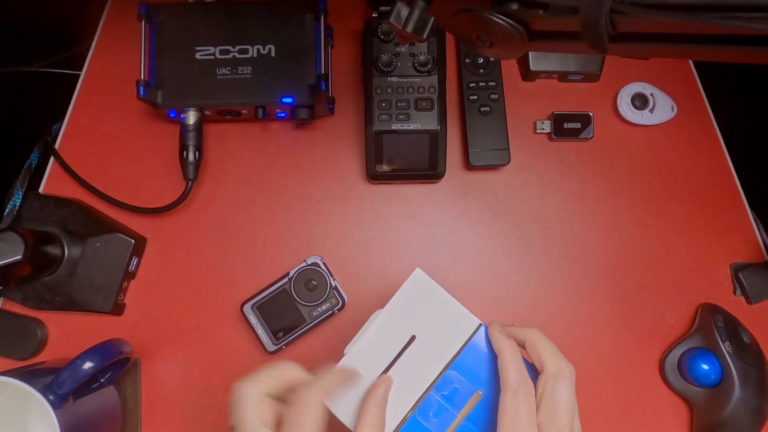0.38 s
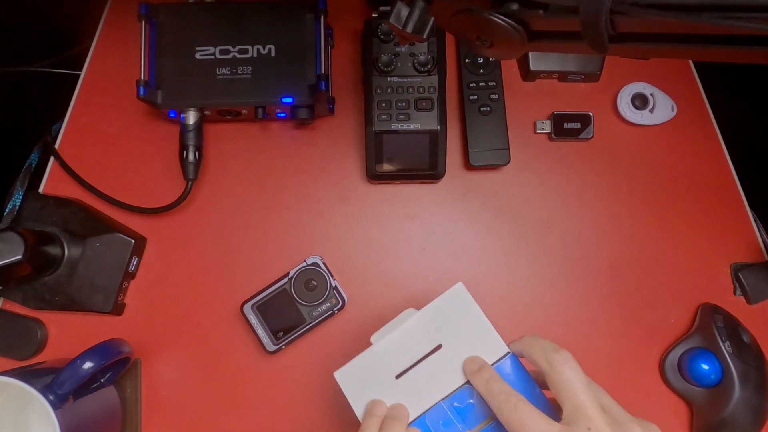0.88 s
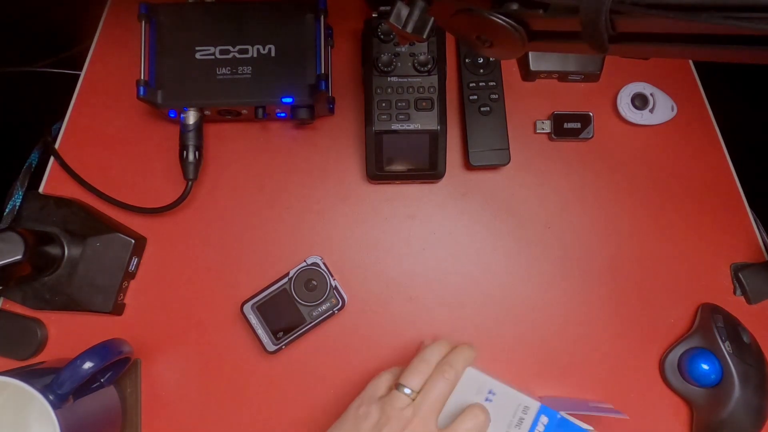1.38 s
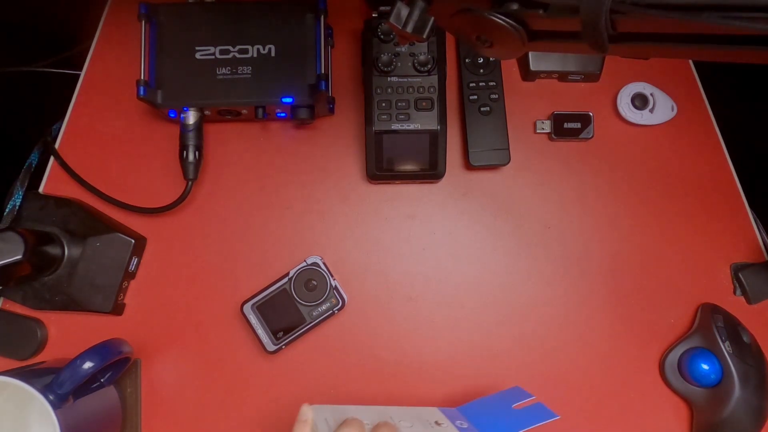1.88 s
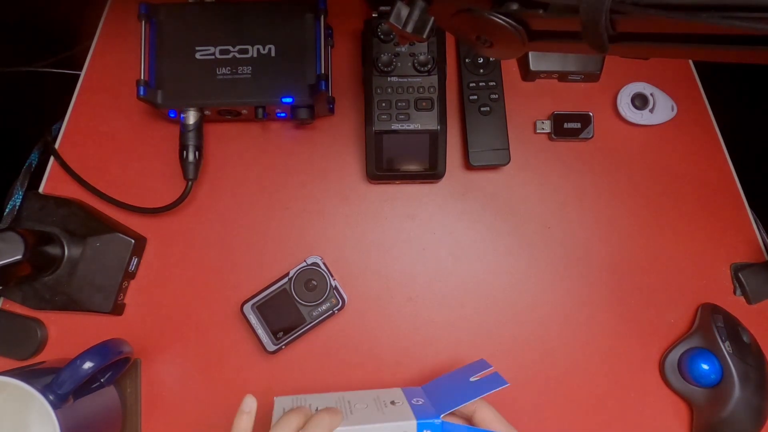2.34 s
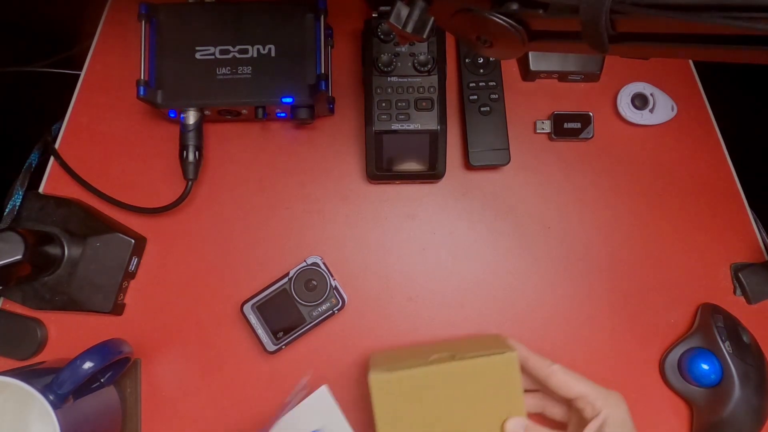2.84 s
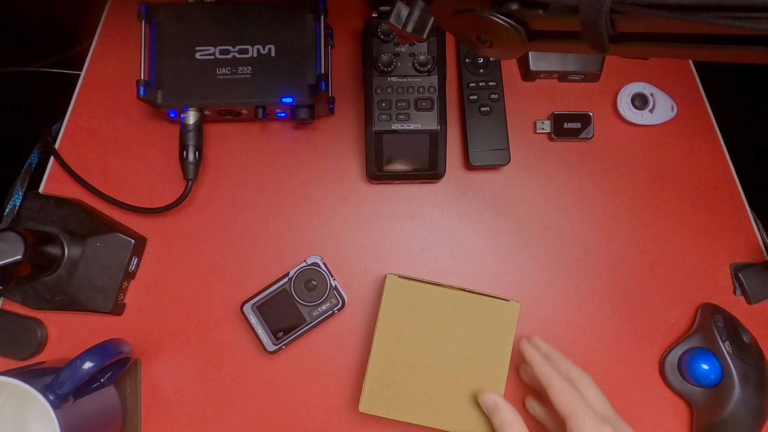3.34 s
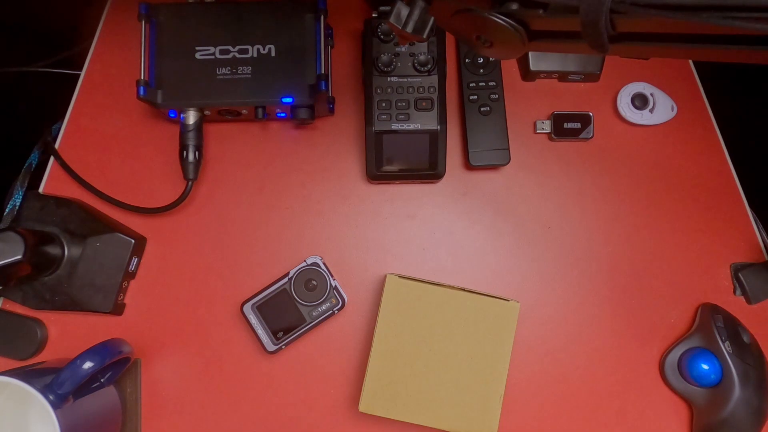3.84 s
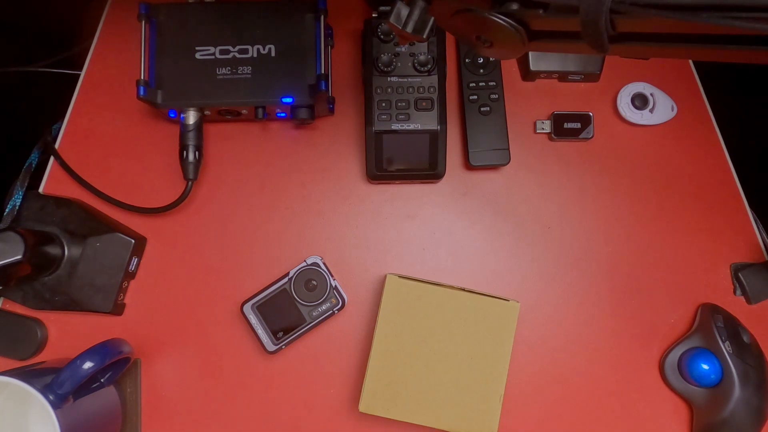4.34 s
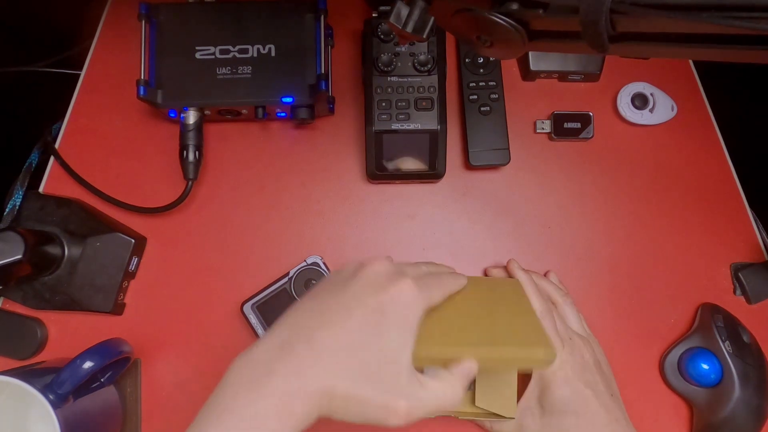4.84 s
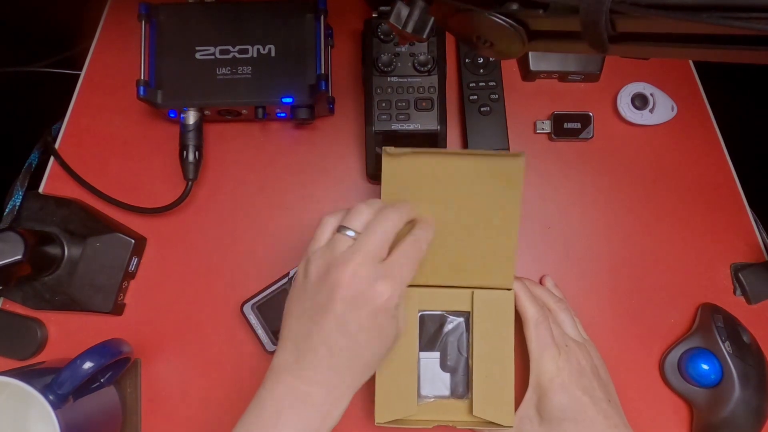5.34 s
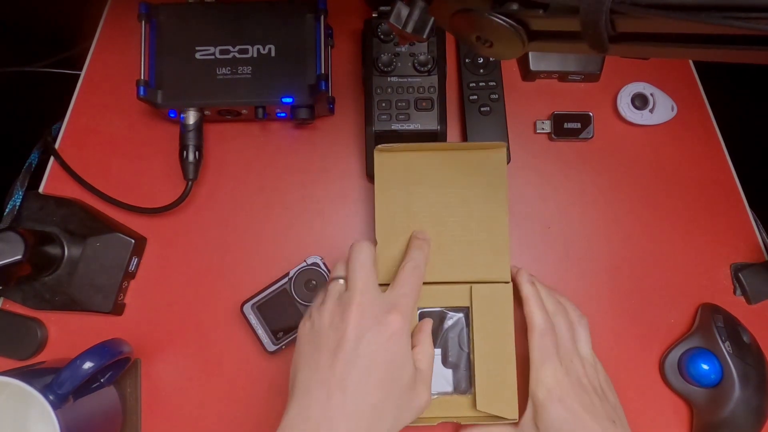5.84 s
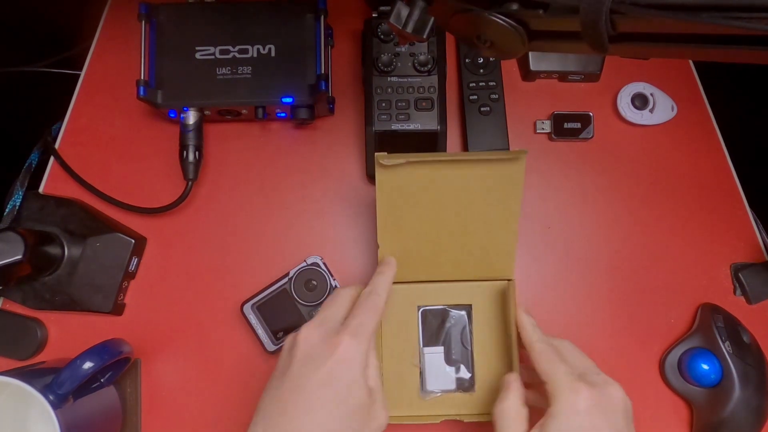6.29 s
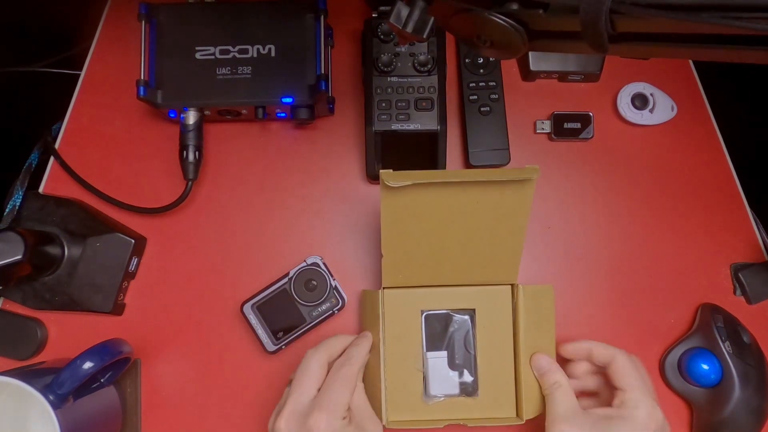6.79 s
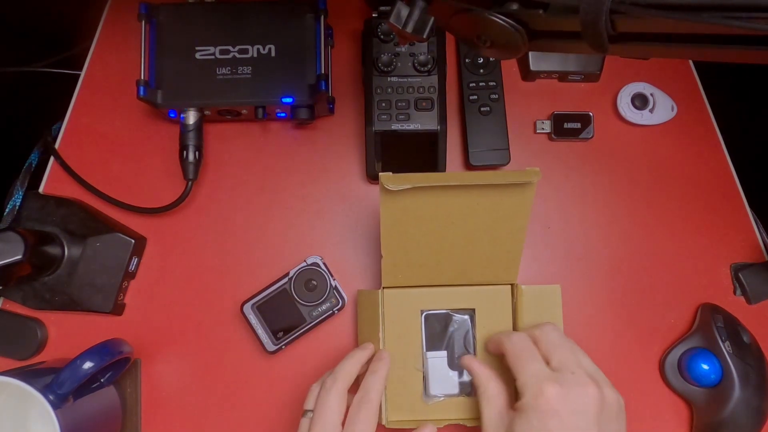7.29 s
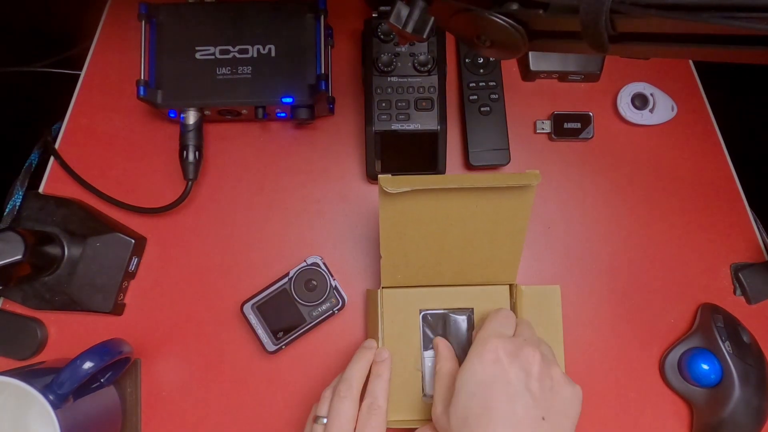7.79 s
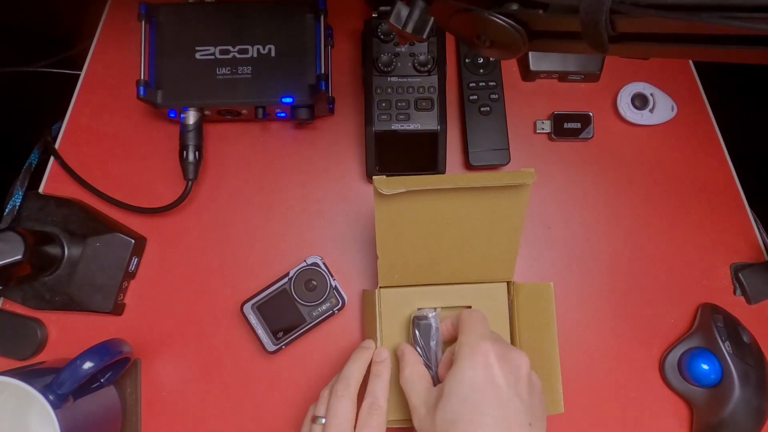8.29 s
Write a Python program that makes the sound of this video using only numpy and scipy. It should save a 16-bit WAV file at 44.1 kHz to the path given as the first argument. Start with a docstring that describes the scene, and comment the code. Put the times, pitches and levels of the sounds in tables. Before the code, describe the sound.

A small cardboard box is handled close to the microphone in a quiet, dry room. From 0 to 0.8 s there is only faint papery rubbing. Around 0.9 to 1.3 s it grows firmer, with quick crease snaps and soft hollow taps, and near 1.85 s comes a sharp double snap with a scrape and knock. Quieter rustling leads to a fuller rasp at 2.6 s. At about 3.2 to 3.3 s the box meets the desk with light hollow knocks, then near silence until 4.65 s. A high singing scrape and a tight burst of hard snaps break it; at 5.1 s a bright squeak, snap and box knock follow. From 5.9 to 7.1 s flaps rub and rasp more strongly with crisp snaps, then softer rubbing and small bright ticks continue to a last snap at 8.65 s. Low rumble swells beneath the movement.

```python
"""Hands work a paper sleeve off a small cardboard box, set it on a desk, pull the lid open and fold the flaps.
Soft rubbing leads to snaps and knocks, then a near hush; a singing scrape and sharp snaps break it, then rubbing
and small snaps go on to the end. Rubs and scrapes are dense grains rung by panel resonances; snaps and thuds are
noise bursts; knocks ring the modes of the hollow box. In a quiet dry room, a deep background rumble of filtered
noise rises while there is sound and sinks in the hush."""
import sys
import numpy as np
from scipy import signal
from scipy.fft import rfft, irfft
from scipy.io import wavfile

SR = 44100
rng = np.random.default_rng(int(sys.argv[2]) if len(sys.argv) > 2 else 0)


def waveform_to_disk(signal):
    """Save audio, clipped to [-1, 1], as 16-bit WAV at the path in sys.argv[1]."""
    frames = np.transpose(np.atleast_2d(signal))
    scaled = np.clip(frames, -1, 1) * 32767
    samples = np.round(scaled).astype(np.int16)
    wavfile.write(sys.argv[1], SR, samples)


def convert_level_to_amplitude(level_db):
    """Map a level in decibels to its linear amplitude factor."""
    exponent = np.asarray(level_db, float) / 20
    return 10 ** exponent


N = 382170

# hollow box meeting the desk or losing its tab: (time [s], level [dB], brightness [dB per octave])
BOX_BLOWS = [(0.912, -38, -2), (1.013, -34.5, -2), (1.291, -29, -4.5), (1.335, -36.5, -3),
             (1.575, -42.5, 1.7), (1.861, -27.5, 2.5), (2.598, -39, -9.5), (2.776, -48, -3),
             (3.232, -24.5, 2.5), (3.244, -28.5, 0), (3.326, -26.5, -2.5), (5.141, -21, -3),
             (5.376, -38, 10), (5.537, -44, 10), (7.463, -53, 9.5), (8.12, -46, -2)]


def rms_one(x):
    """Scale to unit rms."""
    return x / np.sqrt(np.mean(x ** 2) + 1e-20)


def in_time(rows):
    """Columns of a timed table, drawn as straight lines with one value per sample."""
    s, *columns = np.transpose(rows)
    return [np.interp(np.arange(N) / SR, s, column) for column in columns]


def drift(rate_hz):
    """Slow random wander of rms 1: low-passed noise made at a twentieth of the sample rate."""
    r = np.exp(-40 * np.pi * rate_hz / SR)
    noise = rng.standard_normal(N // 20 + 2002)
    slow = signal.lfilter([1], [1, -2 * r, r * r], noise)[2000:]   # skip the filter's start
    return np.interp(np.arange(N) / 20, np.arange(len(slow)), rms_one(slow))


def band(x, low_hz, high_hz, order=2):
    """Butterworth band-pass."""
    return signal.sosfilt(signal.butter(order, [low_hz, high_hz], "band", fs=SR, output="sos"), x)


def resonance(x, hz, width_hz):
    """Two-pole resonance with a peak gain of about 1."""
    r = np.exp(-np.pi * width_hz / SR)
    zeros = np.array([1, 0, -1]) * (1 - r * r) / 2
    poles = [1, -2 * r * np.cos(2 * np.pi * hz / SR), r * r]
    return signal.lfilter(zeros, poles, x)


def coloured(x, spectrum):
    """Give a noise the spectrum of a table."""
    hz, db = np.transpose(spectrum)
    bins_hz = np.arange(N // 2 + 1) * SR / N + 1
    return irfft(rfft(x) * convert_level_to_amplitude(np.interp(np.log(bins_hz), np.log(hz), db)), N)


def stroke(times, db, rise_db, fall_db):
    """One movement touches down, swells, fades and lets go: its samples and their gain."""
    soft_share, soft_db = 0.2, 25.5   # touch and release last this share of the swell and fade
    start, firm, end = times
    s = [start - soft_share * (firm - start), start, firm, end, end + soft_share * (end - firm)]
    at = np.arange(max(int(s[0] * SR), 0), min(int(s[-1] * SR), N))
    below_db = [rise_db + soft_db, rise_db, 0, fall_db, fall_db + soft_db]
    return at, convert_level_to_amplitude(db - np.interp(at / SR, s, below_db))


def rubbing():
    """Skin and paper sliding on card: a fine rasp with crackle in it, ringing fitfully in the free modes."""
    # strokes on card: (start [s], firmest [s], end [s], level [dB], free panel mode [Hz])
    strokes = [(0.0, 0.06, 0.22, -53.5, 2080), (0.137, 0.265, 0.3, -66, 2140),
               (0.345, 0.382, 0.45, -55.5, 950), (0.438, 0.469, 0.58, -55.5, 946),
               (0.566, 0.589, 0.72, -60.5, 1000), (0.646, 0.76, 0.85, -62, 990),
               (0.815, 0.922, 1.0, -51, 880), (1.035, 1.048, 1.1, -52, 980),
               (1.077, 1.12, 1.17, -71.5, 990), (1.148, 1.212, 1.3, -43, 2130),
               (1.256, 1.294, 1.55, -43.5, 2180), (1.521, 1.582, 1.62, -53, 1260),
               (1.606, 1.645, 1.777, -50, 1290), (1.69, 1.731, 1.82, -57, 1280),
               (1.76, 1.856, 1.91, -50, 1330), (1.887, 1.97, 2.07, -49, 3140),
               (2.09, 2.196, 2.3, -57, 1960), (2.28, 2.444, 2.475, -55.5, 1870),
               (2.536, 2.621, 2.845, -39.5, 990), (2.616, 2.728, 2.907, -53, 2450),
               (3.207, 3.28, 3.33, -53, 880), (3.299, 3.327, 3.4, -55, 930),
               (3.384, 3.452, 3.65, -85, 1016), (3.55, 3.722, 3.8, -84, 2300),
               (3.801, 3.806, 3.97, -76, 980), (3.83, 3.889, 3.9, -79, 1024), (4.01, 4.037, 4.07, -78, 870),
               (4.12, 4.131, 4.15, -70.5, 1355), (4.22, 4.262, 4.29, -82, 888),
               (4.35, 4.415, 4.44, -80, 824), (4.443, 4.451, 4.52, -78.5, 803),
               (4.665, 4.675, 4.7, -38.5, 2570), (4.732, 4.799, 4.9, -53, 1140),
               (4.797, 4.954, 5.08, -45, 1200), (5.141, 5.217, 5.415, -46, 3000),
               (5.388, 5.418, 5.49, -54.5, 960), (5.47, 5.525, 5.56, -62.5, 960),
               (5.548, 5.597, 5.69, -58, 940), (5.748, 5.784, 5.86, -58.5, 1005),
               (5.807, 5.881, 5.93, -53, 970), (5.902, 5.905, 6.1, -46, 970),
               (6.174, 6.2, 6.3, -48.5, 1005), (6.264, 6.339, 6.45, -43, 1000), (6.35, 6.49, 6.6, -40, 990),
               (6.528, 6.616, 6.66, -40.5, 1380), (6.687, 6.76, 6.778, -35.5, 1080),
               (6.784, 6.837, 6.93, -44.5, 1130), (6.866, 7, 7.1, -41, 1042), (7.0, 7.123, 7.16, -48, 1160),
               (7.146, 7.185, 7.27, -62.5, 1080), (7.262, 7.311, 7.38, -59, 1080),
               (7.324, 7.43, 7.47, -62.5, 1070), (7.44, 7.494, 7.62, -51.5, 1830),
               (7.558, 7.65, 7.7, -47.5, 1890), (7.687, 7.746, 7.8, -47.5, 990),
               (7.817, 7.98, 8.06, -56.5, 1100), (8.114, 8.143, 8.26, -46.5, 970),
               (8.213, 8.33, 8.385, -47.5, 980), (8.364, 8.406, 8.44, -60, 1070),
               (8.436, 8.497, 8.56, -54.5, 1100), (8.521, 8.588, 8.67, -52.5, 1075)]
    # how freely the handled card rings:
    # (time [s], share of the scuff in the free modes [0-1], hiss over scuff [dB], thrum over scuff [dB])
    grip = [(0.0, 0.82, -4.5, -10), (0.9, 0, -0.5, -3.5), (1.3, 0.02, -7, -6), (1.7, 0.01, -5, -5.5),
            (2.0, 0.28, -6, -7), (2.7, 0, -2, -11.5), (3.3, .15, -3, -3), (4.3, 0.27, -1.5, -6),
            (4.6, 0.4, -5.5, -8), (4.8, 0, -0.5, -7), (5.2, 0.02, 2.5, -9.5), (5.45, 0.5, -6.5, 1),
            (5.7, 0.55, -1.5, -12.5), (6.0, 0, -5.5, -8), (6.5, 0.07, 1.5, -19), (7.0, 0.66, -8.5, -13.5),
            (7.3, 0.6, -1.5, -3), (7.6, 0, -4, -7), (8.1, 0.09, -3, -6), (8.67, 0, -5.5, -9.5)]
    rise_db, fall_db = 13.5, 20   # swell up to the firmest moment, fade after it
    second_mode_ratio = 1.9
    rasp = grains(12000, spread_db=2.5, clump_db=1.5)
    rasp = rasp + 0.3 * crackle(830, cycles=12.0) + 0.3 * crackle(60, cycles=9.0)
    scuff, hiss, thrum = card(rasp, grip_db=2.5)
    first_flicker = convert_level_to_amplitude(5.2 * drift(26.0))
    second_flicker = convert_level_to_amplitude(5.2 * drift(26.0))

    # the fingers shift
    share, hiss_db, thrum_db = in_time(grip)
    share = np.clip(share, 0, 1)
    hiss_db = hiss_db + 2.8 * drift(9.0)
    thrum_db = thrum_db + 3.0 * drift(12.0)

    creaky_scuff = rms_one(scuff + convert_level_to_amplitude(-9) * creaks(rasp))
    plain = np.sqrt(1 - share) * creaky_scuff + convert_level_to_amplitude(hiss_db) * hiss + convert_level_to_amplitude(thrum_db) * thrum
    out = np.zeros(N)
    for *times, db, hz in strokes:
        at, gain = stroke(times, db, rise_db, fall_db)
        first = first_flicker[at] * rms_one(resonance(rasp[at], hz, hz * 0.075))
        second = second_flicker[at] * rms_one(resonance(rasp[at], hz * second_mode_ratio, hz * 0.11))
        free_ring = rms_one(first + 0.12 * second)
        out[at] += gain * (plain[at] + np.sqrt(share[at]) * free_ring)
    return out


def grains(per_s, spread_db, clump_db):
    """Fibres catch at random, in clumps, with uneven sizes."""
    sizes = convert_level_to_amplitude(spread_db * np.minimum(rng.exponential(1, N), 5)) * rng.choice([-1, 1], N)
    caught = rng.random(N) < per_s / SR
    return rms_one(sizes * caught * convert_level_to_amplitude(clump_db * drift(38)))


def crackle(per_s, cycles):
    """Small creases tick in clumps, each ringing a few cycles at one of 18 pitches dealt at random."""
    ticks = grains(per_s, spread_db=2.0, clump_db=3.0)
    pitches = np.geomspace(350, 6000, 18)
    dealt = rng.integers(0, len(pitches), N)
    out = np.zeros(N)
    for k, hz in enumerate(pitches):
        mine = ticks * (dealt == k) + 1e-18   # the offset keeps the filter off denormals
        out += resonance(mine, hz, hz / cycles) / hz ** 0.12
    return rms_one(out)


def creaks(rasp):
    """Bent card creaks: narrow tones all over the middle range, each coming and going on its own."""
    out = np.zeros(N)
    for hz in np.geomspace(700, 5200, 14) * rng.uniform(0.94, 1.06, 14):
        fits = convert_level_to_amplitude(9 * drift(5.9))
        out += fits * resonance(rasp, hz, hz * 0.01) / hz ** 0.33
    return rms_one(out)


def card(x, grip_db):
    """The rasp rings in panels whose levels wander with the grip; returned as scuff, hiss and thrum of rms 1."""
    # broad rasp of fibres: (frequency [Hz], relative level [dB])
    rasp_spectrum = [(71, -17.5), (120, -3.5), (250, 1), (748, -4.5), (2640, -0.5), (3440, -3),
                     (6460, -17.5), (14000, -12), (15500, -32)]
    # panel resonances laid over the rasp: (frequency [Hz], width [Hz], gain [dB])
    panel_modes = [(270, 73, -13.5), (408, 170, 2.5), (1100, 270, 5.5), (1930, 1000, -2), (2990, 290, -11),
                   (4680, 1100, -3), (6580, 900, 20.5)]
    broad = coloured(x, rasp_spectrum)
    ringing = broad
    for hz, width_hz, db in panel_modes:
        ringing = ringing + convert_level_to_amplitude(db + grip_db * drift(2.7)) * resonance(broad, hz, width_hz)

    # split at 650 and 4200 Hz, each crossover half an octave wide
    octaves = np.log2(np.arange(N // 2 + 1) * SR / N + 1)
    low = np.clip(0.5 + (np.log2(650) - octaves) * 2, 0, 1)
    high = np.clip(0.5 + (octaves - np.log2(4200)) * 2, 0, 1)
    spectrum = rfft(ringing)
    return [rms_one(irfft(spectrum * part, N)) for part in (1 - low - high, high, low)]


def slips():
    """A tight edge judders; part of its scrape sings in one narrow panel resonance."""
    # edges slipping past each other; an end ahead of the hardest moment cuts the scrape off:
    # (start [s], hardest [s], end [s], level [dB], singing pitch [Hz], share that sings [0-1])
    scrapes = [(0.286, 0.305, 0.335, -42.5, 1030, 0.17), (0.952, 1.016, 1.06, -39.5, 1980, 0.37),
               (1.838, 1.872, 1.895, -30, 1734, 0.06), (2.6, 2.64, 2.653, -38.5, 2900, 0.8),
               (2.664, 2.696, 2.676, -45, 1510, 1), (4.673, 4.707, 4.75, -25, 2580, 0.94),
               (5.091, 5.129, 5.165, -33.5, 6230, 0.68), (5.372, 5.385, 5.44, -39, 376, 0.56),
               (5.515, 5.52, 5.56, -49, 373, 0.7), (5.9, 5.923, 5.66, -47.5, 1680, 0.5),
               (5.516, 5.544, 5.565, -40.5, 1870, 0.3), (6.107, 6.122, 6.185, -41.5, 1400, 0.08),
               (6.521, 6.549, 6.55, -33.5, 4070, 0.57), (6.615, 6.67, 6.71, -28, 2075, .3),
               (8.045, 8.099, 8.14, -37.5, 2940, 0.13), (8.59, 8.65, 8.67, -41.5, 2920, 0.02)]
    rise_db, fall_db = 18.5, 18
    rasp = grains(10000, spread_db=3.5, clump_db=1.0)
    scuff, hiss, thrum = card(rasp, grip_db=3.0)
    noise = convert_level_to_amplitude(-3) * hiss + convert_level_to_amplitude(-14) * thrum
    fits = convert_level_to_amplitude(4.0 * drift(60.0))   # the squeak comes in fits
    out = np.zeros(N)
    for *times, db, hz, share in scrapes:
        at, gain = stroke(times, db, rise_db, fall_db)
        song = rms_one(resonance(rasp[at], hz, 50.0 + hz * 0.022) * fits[at])
        share = np.clip(share, 0, 1)
        out[at] += gain * (np.sqrt(1 - share) * scuff[at] + np.sqrt(share) * song + noise[at])
    return out


def snaps():
    """Each snap: a ring at its own pitch, a wider body, a bright crack and a dull thump, gone in milliseconds."""
    # creases, tabs and fingertips: (time [s], level [dB], ring [Hz], crack against that level [dB])
    creases = [(0.3, -47, 1100, -31), (0.841, -39.5, 820, -14.5), (0.914, -29.5, 1830, -9.5),
               (1.016, -24.5, 900, -26), (1.026, -30.5, 3380, -39), (1.171, -33, 1110, -12),
               (1.218, -28.5, 1640, -18), (1.237, -17, 2180, -10.5), (1.267, -27, 1580, -12.5),
               (1.292, -34, 1730, -12.5), (1.336, -38.5, 1170, -6.5), (1.365, -34, 2870, -31),
               (1.459, -34.5, 1030, -29), (1.725, -37, 2140, -30), (1.84, -24.5, 1380, -26.5),
               (1.865, -18, 2470, -16.5), (1.877, -16, 1520, -13), (2.193, -40.5, 1630, -30),
               (2.881, -41, 2340, -19), (3.203, -35.5, 1886, -4), (3.233, -35.5, 1300, -41),
               (3.325, -32, 934, -28.5), (4.69, -20.5, 2590, -16), (4.714, -14, 2620, -4),
               (4.727, -15, 2600, -22.5), (4.737, -11.5, 2860, -10.5), (5.095, -34, 7230, 5.5),
               (5.123, -24, 6500, 3.5), (5.136, -11, 6040, -19.5), (5.147, -16.5, 1100, -12.5),
               (5.375, -28.5, 1260, -17), (5.534, -20.5, 960, -27), (5.908, -37, 955, -41),
               (6.146, -22.5, 1260, -21), (6.175, -22, 6340, -41), (6.294, -25.5, 1030, -4),
               (6.351, -14, 6400, 0.5), (6.528, -16.5, 3900, -28.5), (6.578, -30, 1410, -6),
               (6.679, -14, 6900, 0), (6.98, -32, 1130, -6), (7.461, -39, 1130, -17),
               (7.581, -26.5, 6460, -4.5), (7.628, -29, 6500, -10), (7.847, -47.5, 1590, -28),
               (7.917, -31.5, 6900, -15), (7.953, -25.5, 1880, 3), (7.978, -35.5, 2090, -6),
               (8.051, -31.5, 925, -24), (8.096, -26, 6850, -7), (8.126, -26, 3200, -17.5),
               (8.159, -29.5, 2850, -3), (8.206, -37, 2680, 0), (8.24, -34.5, 2880, -3),
               (8.256, -19.5, 6850, -49), (8.298, -27.5, 3080, 1), (8.363, -25.5, 6000, -22),
               (8.454, -40.5, 2740, -29), (8.477, -38.5, 2660, -25), (8.65, -16, 2810, -24)]
    size = 2000
    t = np.arange(size) / SR
    rise = 1 - np.exp(-t / 0.001)   # the crease gives way over a moment
    out = np.zeros(N + size)
    for s, db, hz, crack_db in creases:
        burst = rise * rng.standard_normal(size)
        ring = resonance(burst * np.exp(-t / 0.0015), hz, hz * 0.16)
        body = band(burst * np.exp(-t / 0.0033), 780, 4100, order=1)
        crack = band(burst * np.exp(-t / 0.00046), 3100, 13000)
        thump = band(burst * np.exp(-t / 0.0039), 290, 720)
        ring, body, crack, thump = (v / np.abs(v).max() for v in (ring, body, crack, thump))
        thump_db = -10 - 10.5 * np.log2(hz / 1000)   # small stiff creases thump less
        snap = 0.7 * ring + 0.5 * body + convert_level_to_amplitude(crack_db) * crack + convert_level_to_amplitude(thump_db) * thump
        at = round(s * SR)
        out[at:at + size] += convert_level_to_amplitude(db) * snap
    return out[:N]


def knocks():
    """A soft blow strikes every box mode with a strength of its own; a broad, heavy blow favours the deep ones."""
    # modes of the hollow box: (frequency [Hz], level [dB], time to fall 60 dB [s])
    box_modes = [(70, -21.5, 0.16), (145, -16, 0.026), (247.7, -4.5, 0.042), (358.3, -4.5, 0.055),
                 (640, -18.5, 0.13), (1265, -27, 0.021), (1700, -21, .04)]
    s, db, tilt_db = np.transpose(BOX_BLOWS)
    out = np.zeros(N)
    for hz, mode_db, t60 in box_modes:
        strength_db = rng.normal(0, 1.5, len(s))
        blows = np.full(N, 1e-18)
        blows[(s * SR).astype(int)] = convert_level_to_amplitude(db + mode_db + strength_db + tilt_db * np.log2(hz / 250))
        r = convert_level_to_amplitude(-60 / (t60 * SR))
        w = 2 * np.pi * hz / SR
        out += signal.lfilter([0, np.sin(w)], [1, -2 * r * np.cos(w), r * r], blows)
    return signal.lfilter(signal.windows.hann(45) / 22, 1, out)   # a millisecond of soft contact


def thuds():
    """With each knock the walls of the box give a short dull puff."""
    size = 3000
    t = np.arange(size) / SR
    swell = np.exp(-t / 0.0059) * (1 - np.exp(-t / 0.0012))
    out = np.zeros(N + size)
    for s, db, _ in BOX_BLOWS:
        puff = band(rng.standard_normal(size) * swell, 180, 1100, order=1)
        at = int(s * SR)
        out[at:at + size] += convert_level_to_amplitude(db - 7) * puff / np.abs(puff).max()
    return out[:N]


def room(x):
    """A short dull tail of scattered reflections from desk and walls."""
    level_db, t60_s = -17.5, 0.032
    t = np.arange(SR // 4) / SR
    tail = band(rng.standard_normal(len(t)), 310, 10000, order=1)
    tail = tail * convert_level_to_amplitude(-60 * t / t60_s) * (t > 0.003)   # nothing returns in the first 3 ms
    return convert_level_to_amplitude(level_db) * signal.fftconvolve(x, tail / np.sqrt(np.sum(tail ** 2)))[:N]


def rumble():
    """Deep background rumble, low-passed noise that rises while there is sound and sinks in the hush."""
    # swells of the rumble: (time [s], level [dB])
    swells = [(0.0, -56.5), (0.7, -64.5), (1.04, -52), (1.12, -63), (1.23, -47.5), (2.0, -53.5),
              (2.12, -68), (2.52, -67), (2.61, -51.5), (2.85, -59), (2.95, -79), (3.19, -89), (3.3, -56),
              (3.4, -58), (3.56, -60), (3.7, -70.5), (4.65, -75.5), (4.69, -42), (4.87, -43), (5.08, -57),
              (5.14, -44.5), (5.24, -50), (5.84, -60), (6.78, -49), (7.3, -62), (8.13, -53), (8.67, -57)]
    deep = band(rng.standard_normal(N), 4.1, 15) + 0.13 * band(rng.standard_normal(N), 32, 85)
    return convert_level_to_amplitude(in_time(swells)[0]) * rms_one(deep * convert_level_to_amplitude(1.5 * drift(8.0)))


def quiet_air():
    """The hush of the room: faint coloured noise whose level drifts a little."""
    # spectrum of the hush: (frequency [Hz], relative level [dB])
    hush_spectrum = [(59, -25.5), (100, 2.5), (399, -12.5), (535, -7), (660, -20.5), (885, -15.5),
                     (6480, -28), (15000, -27.5)]
    level_db = -82.5 + 1.0 * drift(2.4)
    return convert_level_to_amplitude(level_db) * rms_one(coloured(rng.standard_normal(N), hush_spectrum))


def scene():
    """Everything at one microphone."""
    hands = rubbing() + slips() + snaps() + knocks() + thuds()
    return (hands + room(hands) + rumble() + quiet_air())[None]


def low_pass(x):
    """Removes everything above the highest recorded frequency."""
    return signal.sosfilt(signal.butter(12, 15770, fs=SR, output="sos"), x)


def record(dry):
    """The microphone falls off at the top, above 14.5 kHz."""
    heard = signal.sosfilt(signal.butter(4, 14500, fs=SR, output="sos"), dry)
    return low_pass(heard)


dry = scene()
out = record(dry)
waveform_to_disk(out)
```